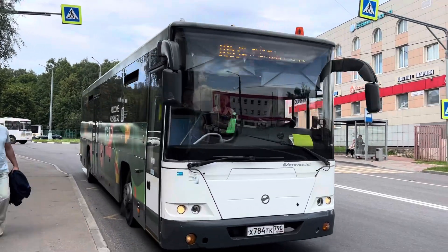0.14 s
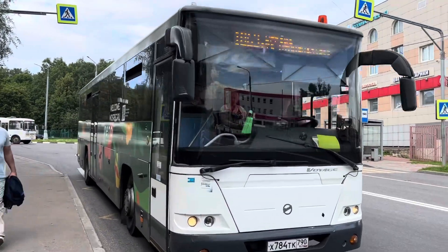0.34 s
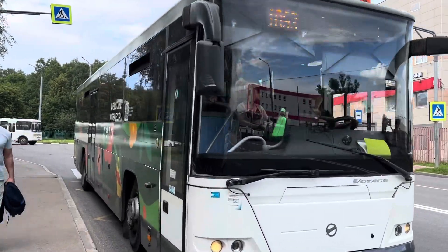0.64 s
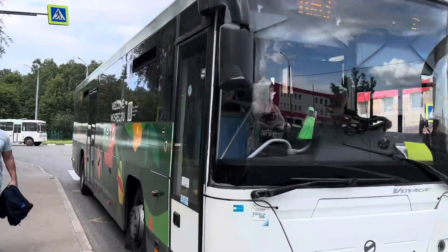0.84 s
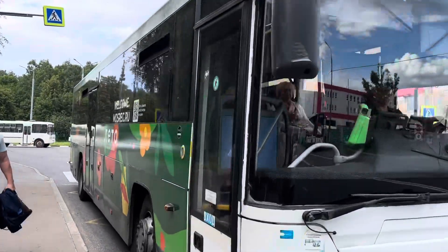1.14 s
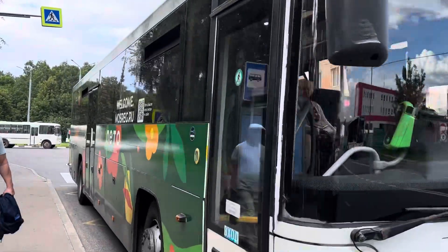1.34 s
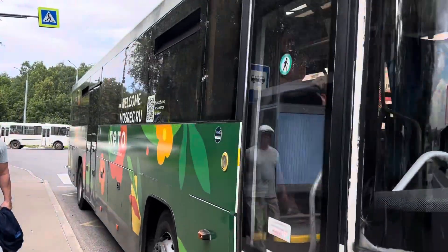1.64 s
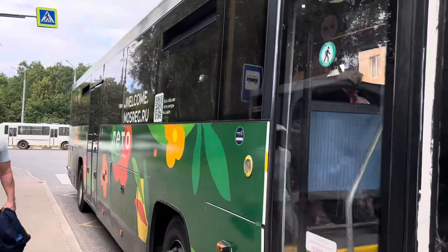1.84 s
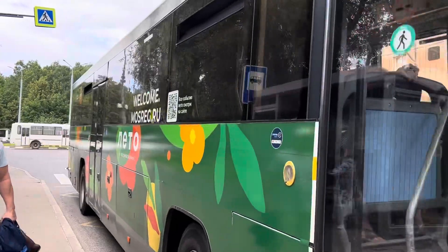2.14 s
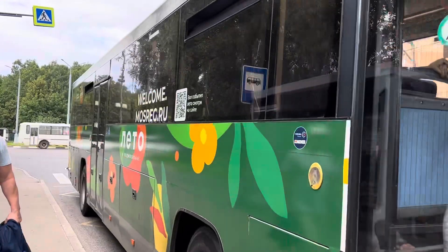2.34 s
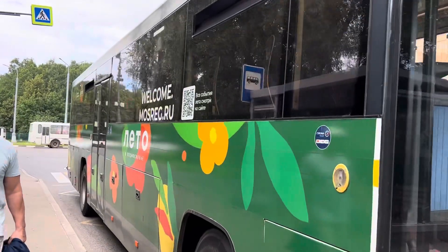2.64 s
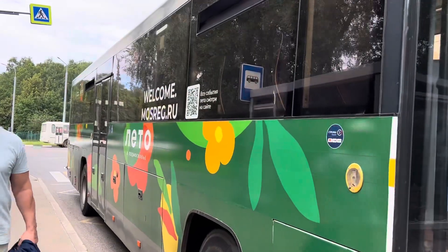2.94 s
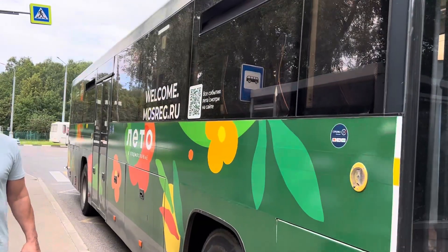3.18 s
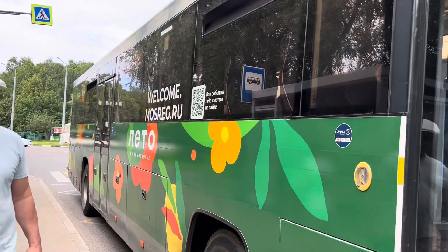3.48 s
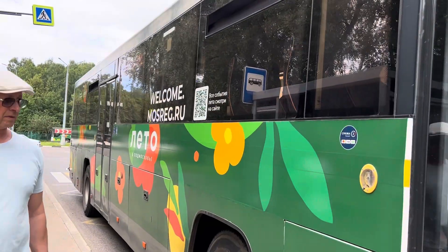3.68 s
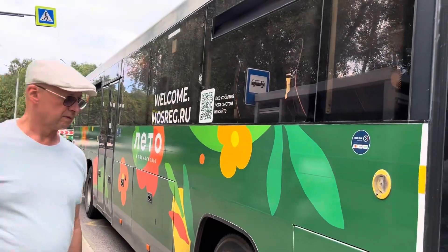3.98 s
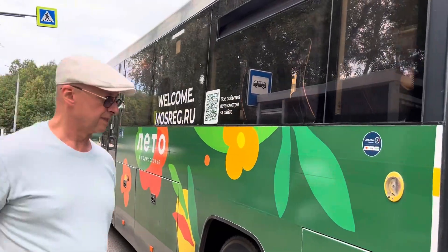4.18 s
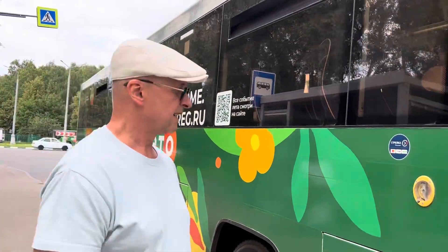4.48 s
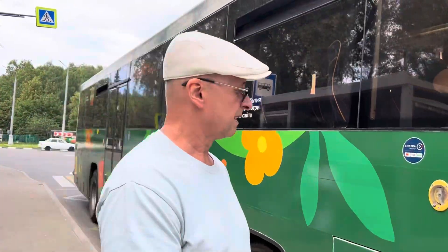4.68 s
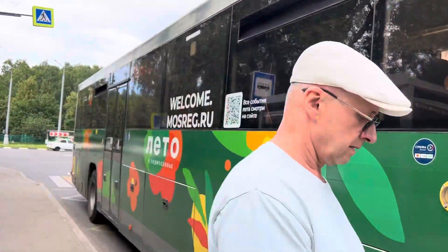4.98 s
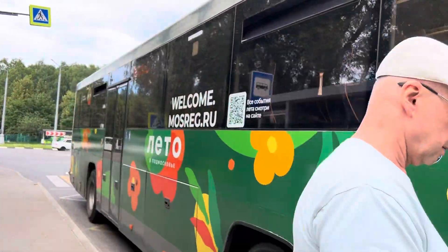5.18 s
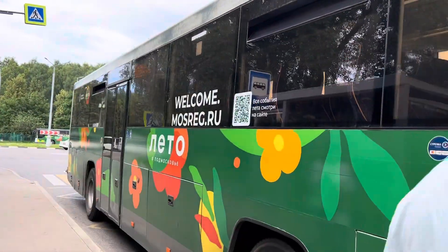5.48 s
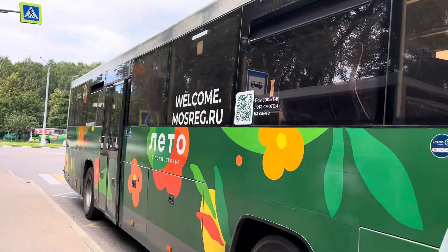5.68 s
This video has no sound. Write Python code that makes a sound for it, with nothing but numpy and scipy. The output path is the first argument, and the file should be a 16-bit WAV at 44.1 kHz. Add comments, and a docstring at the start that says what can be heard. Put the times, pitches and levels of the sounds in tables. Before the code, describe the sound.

High metallic bus brakes shriek and waver for under three seconds, then stop amid dull thuds, leaving a rumbling idle and tiny air puffs.

```python
"""Brake squeal over a diesel: a city bus rolls up to a roadside stop and halts by a phone on the pavement.
Several brake modes, tones with random flutter, beat together over filtered pad hiss and a tyre drone.
Low thumps, soft pushes coloured by a few resonances, and gusts of noise come mostly around the halt.
Noise shaped into rumble, drone and clatter, plus a hum, makes the diesel idling on at the far end.
Enveloped noise gives the air vents, a thin lingering hiss, small ticks and short valve puffs."""
import sys
import numpy as np
from scipy import signal
from scipy.fft import rfft, irfft
from scipy.io import wavfile

SR = 44100
rng = np.random.default_rng(int(sys.argv[2]) if len(sys.argv) > 2 else 0)


def to_wav(sig):
    """Store sig (one row per channel, or 1-D mono) as 16-bit WAV at the path in sys.argv[1].

    Samples outside -1..1 are clipped; the rate is SR.
    """
    pcm = np.clip(np.atleast_2d(sig), -1, 1) * 32767
    pcm = np.round(pcm).astype(np.int16)
    wavfile.write(sys.argv[1], SR, pcm.T)  # frames by channels


N = 256662
TIME = np.arange(N) / SR
FREQ = np.arange(N // 2 + 1) * SR / N

# the bus rolling in to its halt: (time [s], speed [m/s])
SPEED = [(0, 3.6), (.3, 3.5), (.6, 2.9), (1, 2.2), (1.4, 1), (2, .5), (2.4, .3), (2.7, 0)]
# the main squeal sags a little with the pad pressure: (time [s], pitch before Doppler and judder [Hz])
MAIN_PITCH = [(.3, 4718), (.62, 4708), (1.03, 4720), (1.25, 4688), (1.52, 4684), (1.8, 4710), (2.6, 4712)]
# level of the unrelated reflections against the direct sound (dB)
EXHAUST_DIFFUSE_DB, BLOCK_DIFFUSE_DB, TREBLE_DIFFUSE_DB = -16, -11, -9


def undb(db):
    """Decibels to gain."""
    return 10 ** (np.asarray(db) / 20)


def unit(x):
    """Scale to rms 1."""
    return x / np.sqrt(np.mean(np.abs(x) ** 2))


def curve(rows, order=1):
    """One column of a table, joined by straight lines in time."""
    rows = np.array(rows)
    return np.interp(TIME, rows[:, 0], rows[:, order])


def swell(rows):
    """Gain of a level table, fading away outside its span."""
    outside = np.maximum(rows[0][0] - TIME, 0) + np.maximum(TIME - rows[-1][0], 0)
    return undb(curve(rows)) * np.exp(-outside / 0.13)


def envelope(start, db, rise, fall, hold=0):
    """Gain with a straight rise, a hold and an exponential fall (times in s)."""
    age = TIME - start
    attack = np.clip(age / rise, 0, 1)
    decay = np.exp(-np.maximum(age - rise - hold, 0) / fall)
    return undb(db) * attack * decay


def noise(colour):
    """Noise of rms 1 with the given spectrum, falling 24 dB per octave beyond its ends."""
    hz, db = np.transpose(colour)
    octave, marks = np.log2(FREQ + 1), np.log2(hz)
    beyond = np.maximum(marks[0] - octave, 0) + np.maximum(octave - marks[-1], 0)
    gain = undb(np.interp(octave, marks, db) - 24 * beyond)
    return unit(irfft(rfft(rng.standard_normal(N)) * gain, N))


def wander(rate):
    """Random motion of rms 1, mostly slower than the rate (Hz)."""
    return unit(irfft(rfft(rng.standard_normal(N)) / (1 + (FREQ / rate) ** 2), N))


def flutter(rate, order=1):
    """Random motion of a tone's size and phase; a higher order keeps the tone tighter."""
    # drawn at 1/32 of the sample rate, then joined by straight lines
    offset = np.fft.fftfreq(N // 32, 32 / SR)
    lines = rng.standard_normal(len(offset)) + 1j * rng.standard_normal(len(offset))
    slow = np.fft.ifft(lines / (1 + np.abs(offset / rate) ** (2 * order)))
    return unit(np.interp(TIME, np.linspace(0, TIME[-1], len(slow)), slow))


def ports(hz):
    """Phase turn of the left and right microphone port at these frequencies."""
    # lead of the left port over the right: (frequency [Hz], phase [rad])
    port_phase = [(0, 0), (950, -.8), (1800, .2), (2500, 1.5), (3700, 1.1), (4750, 2.05), (5600, 2.8),
                  (6500, 3.3), (7200, 5.6), (9000, 6.7), (9450, 8.3), (9900, 9.3), (10700, 9.85),
                  (11400, 12), (13300, 12.5), (14200, 14.8), (15500, 15.7)]
    lead = np.interp(hz, *np.transpose(port_phase))
    return np.exp(1j * lead * np.array([[1], [-1]]) / 2)


def sides(pan_db):
    """Gains of the left and right port; positive pans left."""
    return undb(np.array([[pan_db], [-pan_db]]) / 2)


def spread(colour, diffuse_db, pan_db):
    """A noisy source at both ports: a direct part and unrelated reflections."""
    direct = irfft(rfft(noise(colour)) * ports(FREQ), N)
    reflections = np.array([noise(colour), noise(colour)])
    return unit(direct + undb(diffuse_db) * reflections) * sides(pan_db)


def bursts(rows, colour):
    """Jets of noise that open quickly and die away."""
    return sum(envelope(*row) for row in rows) * spread(colour, TREBLE_DIFFUSE_DB, 0)


def doppler():
    """Factor by which the approach raises every brake pitch (sound travels at 343 m/s)."""
    return 1 + curve(SPEED) / 343


def travel_left():
    """Metres that the bus has still to roll."""
    return np.cumsum(curve(SPEED)[::-1])[::-1] / SR


def nearness(rest_m):
    """Gain of a source that ends up this far away, 1 at rest."""
    return rest_m / (rest_m + travel_left())


def caught(mode):
    """Gain of one brake mode as it catches, holds and lets go."""
    # catches, before each mode's trim: (mode, time [s], level [dB], rise [s], fall [s], hold [s])
    catch_rows = [("upper", -0.035, -31, 0.018, 0.025, 0.021), ("upper", 0.048, -31.5, 0.023, 0.027, 0.014),
                  ("upper", 0.15, -49, 0.022, 0.022, 0.059), ("low", 0.243, -47.5, 0.039, 0.097, .05),
                  ("low", 0.407, -48, .04, 0.027, .04), ("low", 0.54, -45, 0.032, 0.017, 0.04),
                  ("low", 0.66, -42, 0.015, 0.0076, 0.019), ("low", 0.74, -55.5, 0.012, 0.12, 0.13),
                  ("low", 1.27, -44, .14, .04, .2), ("low", 1.5, -45.5, .08, .025, .02),
                  ("low", 1.62, -47, .06, .05, .22), ("low", 2.0, -47, .015, .012, .015),
                  ("low", 2.06, -48, 0.047, 0.029, 0.14), ("low", 2.287, -42, .06, 0.15, .022),
                  ("low", 2.82, -65, 0.024, .04, 0.043), ("thin", 0.17, -43.5, 0.071, .03, 0.54),
                  ("thin", 1.59, -37, 0.085, 0.022, 1.02), ("rasp", 0.19, -46, 0.17, 0.33, 0.14)]
    return sum(envelope(*row) for name, *row in catch_rows if name == mode)


def grabs():
    """Gain of the main squeal: a steady swing, and a bell-shaped surge each time the pad bites."""
    # steady swing, easing midway and pressed home for the stop: (time [s], level [dB])
    steady_rows = [(.19, -50), (.27, -29), (.68, -28.5), (.9, -38.5), (.96, -31.5), (1.25, -33),
                   (1.45, -34.5), (1.95, -30.5), (2.15, -39), (2.25, -24), (2.35, -24), (2.38, -25),
                   (2.5, -26), (2.635, -27), (2.675, -48), (2.9, -57)]
    # pad bites: (time of the peak [s], level [dB], length [s])
    surge_rows = [(.3, -21.5, 0.029), (.39, -22.5, 0.085), (0.532, -18.5, 0.025), (0.606, -23.5, 0.045),
                  (0.662, -24, 0.028), (0.787, -26, .016), (0.87, -31, .011), (1.017, -26, 0.042),
                  (1.328, -26.5, .021), (1.581, -24, .013), (1.646, -24.5, 0.036), (1.691, -21, 0.015),
                  (1.724, -23.5, .016), (1.782, -20.5, 0.016), (1.814, -24, 0.014), (1.873, -24, .018),
                  (1.894, -24, 0.019), (1.956, -22.5, .014), (2.042, -18, 0.051), (2.118, -21.5, .022),
                  (2.188, -20.5, 0.031), (2.3, -21.5, 0.044), (2.553, -26.5, .03), (2.602, -24.5, 0.028)]
    power = swell(steady_rows) ** 2
    for peak, db, length in surge_rows:
        bell = np.exp(-(2 * (TIME - peak) / length) ** 2 / 2)
        power += (undb(db) * bell) ** 2
    return np.sqrt(power)


def judder():
    """Hertz by which the juddering pad bends the squeal: slower with the wheel, widest at walking pace."""
    rest_hz, hz_per_m_s = 11, 4.5
    bend_hz, wide_bend_hz = 7, 23  # always, and more at walking pace
    wide_s, wide_span_s = 1.55, .33  # centre and half length of the wide bend
    rate = rest_hz + hz_per_m_s * curve(SPEED)
    swing = np.cos(2 * np.pi * np.cumsum(rate * (1 + .25 * wander(8))) / SR)
    depth = bend_hz + wide_bend_hz * np.exp(-((TIME - wide_s) / wide_span_s) ** 2)
    return depth * (swing + .35 * wander(25))


def squeal(pitch, gain, rough, width_hz, scatter_db, pan_db, overtones_db=(), order=1):
    """One self-excited brake mode: ragged while the wheel turns fast, purer as it stops."""
    speed = curve(SPEED)
    ragged = rough * (0.18 + speed / (speed + 0.4))
    wave = (1 + ragged * flutter(width_hz, order)) / np.sqrt(1 + ragged ** 2)
    # the flutter in size is widened slightly
    size = np.abs(wave) ** 1.08
    phase = 2 * np.pi * np.cumsum(pitch) / SR + np.angle(wave)
    # reflections from road and body lift one port as they weaken the other
    scatter = undb(scatter_db) * flutter(38.5, order) * np.array([[1], [-1]])
    out = np.exp(1j * phase) * ports(pitch) * (1 + scatter)
    # overtones grow faster than the swing
    drive = (gain / gain.max()) ** 0.18
    for multiple, db in enumerate(overtones_db, start=2):
        out = out + undb(db) * drive * np.exp(1j * multiple * phase) * ports(multiple * pitch)
    return np.sqrt(2) * gain * size * np.real(out) * sides(pan_db)


def chirps(bend):
    """Lesser brake modes grow and fade in an arch, bent by the judder and broader the rougher they rub."""
    # (from [s], to [s], pitch before Doppler and judder [Hz], level before trim [dB], roughness [ratio])
    chirp_rows = [(.27, .36, 2458, -54, 1.5), (.83, .95, 2462, -51, 1), (1.35, 1.45, 2460, -56, 1.5),
                  (1.76, 1.85, 2460, -57, 1.5), (2.085, 2.115, 2300, -49, .3), (1.16, 1.21, 4220, -49, 3),
                  (1.41, 1.45, 4290, -49, 2), (1.48, 1.53, 4200, -49, 3), (1.66, 1.72, 4230, -50, 2),
                  (1.85, 1.89, 3950, -50, 3), (1.94, 1.98, 4170, -50, 2), (2.19, 2.23, 4230, -48, 3),
                  (2.235, 2.265, 4375, -48, .5), (1.14, 1.18, 4900, -43, 3), (1.55, 1.61, 4850, -45, 1),
                  (.92, 1.02, 5750, -56, 6), (1.24, 1.45, 6290, -57, 1), (2.7, 3, 6330, -59, .3),
                  (.12, .19, 7400, -59, 6), (.25, .7, 7200, -62, 7), (1.04, 1.09, 8100, -58, 4),
                  (1.05, 1.12, 7620, -58, 4), (1.18, 1.22, 7830, -54, 2), (1.36, 1.48, 7070, -52, 2),
                  (1.385, 1.42, 7300, -51, 3), (1.55, 1.68, 7050, -50, 1.5), (1.78, 1.83, 7200, -52, 4),
                  (2.08, 2.11, 7000, -51, 1), (1.94, 2, 8080, -56, 2), (1.8, 2.52, 7360, -59, 1.2),
                  (1.85, 2.45, 7750, -62, 1.5), (.3, 1.9, 8450, -65, 2), (1.95, 2.6, 8465, -61, .7),
                  (1.8, 2, 12720, -62, 3), (2.42, 2.66, 14555, -60, .3)]
    trim_db = 7.5
    out = np.zeros((2, N))
    shift = doppler() + bend / MAIN_PITCH[-1][1]
    for start, end, hz, db, rough in chirp_rows:
        on = (TIME > start) & (TIME < end)
        arch = np.sqrt(np.abs(np.sin(np.pi * (TIME[on] - start) / (end - start))))
        wave = (1 + rough * flutter(10 + 20 * rough)[on]) / np.sqrt(1 + rough ** 2)
        phase = 2 * np.pi * hz * np.cumsum(shift[on]) / SR
        out[:, on] += undb(db + trim_db) * arch * np.real(wave * np.exp(1j * phase) * ports(hz))
    return out


def squeaks(low_hz, high_hz, count):
    """Tiny pad slips at random moments until the halt, each with its own pitch, glide and size; rms 1."""
    short_s, long_s = .004, .035
    max_glide, size_range_db = .012, 12  # glide as a share of the pitch
    out = np.zeros((2, N))
    for when, place, long, big, glide, turn in rng.random((count, 6)):
        size = int(SR * short_s * (long_s / short_s) ** long)
        start = int(when * SPEED[-1][0] * SR)
        part = np.linspace(0, 1, size)
        hz = low_hz * (high_hz / low_hz) ** place
        gliding_hz = hz * (1 + max_glide * (2 * glide - 1) * part)
        phase = 2 * np.pi * (turn + np.cumsum(gliding_hz) / SR)
        gain = undb(size_range_db * big ** 2) * np.sin(np.pi * np.sqrt(part)) ** 2
        out[:, start:start + size] += gain * np.real(np.exp(1j * phase) * ports(hz))
    return unit(out)


def scrape():
    """The pads hiss and spit metallic squeaks; at walking pace they also chatter around the main squeal."""
    # hiss of the pads: (frequency [Hz], relative level [dB])
    rub_colour = [(2000, 8), (3200, 9), (4400, 10), (5300, 8.5), (6500, 14.5), (7300, -16), (8000, -46),
                  (9300, 20.5), (10200, -11.5), (11500, -21), (12700, -30), (15500, 5)]
    rest_m, knee_m_s = 6, 0.57  # distance at rest; speed below which the pads go quiet
    chatter_s, chatter_span_s = 1.4, 0.56  # peak and half length
    speed = curve(SPEED)
    strength = nearness(rest_m) * speed / np.hypot(speed, knee_m_s)
    hiss = undb(-49) * spread(rub_colour, TREBLE_DIFFUSE_DB, 0)
    grit = undb(-69) * squeaks(6800, 9300, count=1500)
    ringing = undb(-62.5) * squeaks(6950, 7900, count=700)
    chatter_gain = undb(-52.5) * np.exp(-((TIME - chatter_s) / chatter_span_s) ** 2)
    chatter = chatter_gain * squeaks(3950, 4800, count=1900)
    return (hiss + grit + ringing) * strength + chatter


def brakes():
    """Six main modes take turns and beat against each other over chirps and the hiss of the pads."""
    # upper partner slides down to the main squeal, returns higher: (time [s], pitch before Doppler [Hz])
    upper_pitch = [(.09, 4816), (.16, 4792), (.22, 4735), (1.7, 4856), (2.6, 4858), (2.72, 4848)]
    # it takes over in swells, loudest near 2.3 s, and rings out: (time [s], level [dB])
    upper_level = [(1.8, -47), (1.92, -35.5), (1.98, -38), (2.04, -27), (2.075, -31), (2.11, -22),
                   (2.145, -23), (2.175, -28), (2.24, -16), (2.35, -15.5), (2.44, -18), (2.515, -38),
                   (2.56, -20), (2.635, -29.5), (2.68, -25.5), (2.89, -30), (3.06, -63)]
    # highest mode, loudest at the halt, before trim and waver: (time [s], level [dB])
    top_level = [(0.0, -47.5), (0.84, -42.5), (1.85, -42.5), (1.97, -50), (2.03, -40.5), (2.56, -43.5),
                 (2.68, -33.5), (2.95, -54), (3.18, -69)]
    low_hz, thin_hz, rasp_hz, top_hz = 3677, 10592, 11880, 12136  # before Doppler
    lift, bend = doppler(), judder()
    pace = curve(SPEED) / SPEED[0][1]  # 1 at full speed
    upper_hz = curve(upper_pitch) * lift
    out = squeal(curve(MAIN_PITCH) * lift + bend, grabs(), rough=.24, width_hz=52,
                 scatter_db=-6.5, pan_db=-1.0, overtones_db=(-15, -32), order=2)
    out += squeal(upper_hz, undb(4.0) * caught("upper"), rough=0.27, width_hz=40,
                  scatter_db=-4.5, pan_db=-1.5, overtones_db=(-18,))
    out += squeal(upper_hz, swell(upper_level), rough=0.16, width_hz=14,
                  scatter_db=-20, pan_db=-2, overtones_db=(-25,))
    low_drift_hz = 4 * wander(4.7)
    out += squeal(low_hz * lift + low_drift_hz, undb(3.0) * caught("low"), rough=0.13, width_hz=63,
                  scatter_db=-3.5, pan_db=-0.5, overtones_db=(-21,), order=2)
    out += squeal(thin_hz * lift, undb(-2.0) * caught("thin"), rough=0.82, width_hz=59,
                  scatter_db=-21.0, pan_db=0.0)
    # as the wheel slows the highest mode jitters less in pitch and wavers more in strength
    top_jitter_hz = 38 * pace * wander(70)
    top_waver_db = 2.5 * (1.5 - pace) * wander(16)
    out += squeal(top_hz * lift + top_jitter_hz, undb(1.0 + top_waver_db) * swell(top_level),
                  rough=1.06, width_hz=55, scatter_db=-13.0, pan_db=0)
    # at speed the highest mode has a rasping lower neighbour
    out += squeal(rasp_hz * lift, caught("rasp"), rough=4, width_hz=160, scatter_db=-24, pan_db=1)
    return out + chirps(bend) + scrape()


def diesel():
    """Exhaust rumble, gently pulsing block drone, hum and randomly flickering clatter grow on approach."""
    # exhaust rumble: (frequency [Hz], relative level [dB])
    exhaust_colour = [(20, -19), (30, -45), (40, -4), (52, -1.5), (75, 3.5), (110, -2.5), (140, -5),
                      (200, -31), (400, -51)]
    # drone of the engine block: (frequency [Hz], relative level [dB])
    block_colour = [(80, -25), (140, -9), (225, 2.5), (270, -5), (345, -2), (480, -10.5), (680, -10),
                    (900, -13), (1100, -13.5), (1350, -28.5), (2000, -45)]
    # mechanical clatter: (frequency [Hz], relative level [dB])
    clatter_colour = [(700, -13), (1300, 2.5), (1700, 1.5), (2200, 2.5), (2600, -4.5), (3500, -11),
                      (4000, -7), (4500, -9.5), (5300, -9.5), (6200, -19.5), (7800, -18), (10300, -27),
                      (12500, -24), (15500, -27)]
    firing_hz, hum_hz, rest_m = 34.5, 162.2, 14.2
    firing = np.cos(2 * np.pi * np.cumsum(firing_hz * (1 + 0.0773 * wander(3.46))) / SR)
    exhaust_db = -31 + 0.12 * wander(1.4)
    exhaust = spread(exhaust_colour, EXHAUST_DIFFUSE_DB, 0) * undb(exhaust_db)
    block_db = -32.5 + 1.0 * firing + 0.66 * wander(18.0)
    block = spread(block_colour, BLOCK_DIFFUSE_DB, 2.45) * undb(block_db)
    clatter_db = -47 + 0.17 * firing + 1.25 * wander(29)
    clatter = spread(clatter_colour, TREBLE_DIFFUSE_DB, 0.27) * undb(clatter_db)
    hum = undb(-38.5) * np.real((1 + .5 * flutter(3.6)) * np.exp(2j * np.pi * hum_hz * TIME))
    # someone walks past and shades the clatter by 2 dB
    shade = undb(-2 * np.exp(-((TIME - 4.41) / 0.34) ** 2))
    # the drone swells by 1.3 dB once the bus stands
    step = undb(1.3 * np.clip((TIME - 3.9) / 0.25, 0, 1))
    return (exhaust + block * step + clatter * shade + hum) * nearness(rest_m)


def tyres():
    """The front tyre drones as it draws level and falls silent as it stops."""
    # rolling drone: (frequency [Hz], relative level [dB])
    tyre_colour = [(150, -20), (230, -1), (300, -6.5), (450, -5.5), (800, -23), (1300, -17)]
    level_db, rest_m = -33, 0.37  # level at 1 m/s at the resting distance
    rolling = nearness(rest_m) * np.sqrt(curve(SPEED))
    return spread(tyre_colour, BLOCK_DIFFUSE_DB, 1.2) * undb(level_db) * rolling


def gusts():
    """Eddies buffet both ports, partly alike and partly each on its own."""
    # gusts on the microphone, before buffeting: (time [s], level [dB], rise [s], fall [s], hold [s])
    gust_rows = [(0.377, -39, 0.055, 0.12, 0.29), (2.643, -20.5, 0.029, 0.033, 0.064),
                 (2.86, -27.5, 0.052, 0.13, 0.028), (3.113, -19, 0.033, 0.029, 0.012),
                 (3.644, -25.5, 0.11, 0.36, 0.089)]
    # rumble of the air: (frequency [Hz], relative level [dB])
    gust_colour = [(25, -18), (50, 4.5), (110, -1.5), (200, -10), (350, -21), (700, -43.5)]
    strength = sum(envelope(*row) for row in gust_rows) * undb(3.4 * wander(11))
    return spread(gust_colour, -4.0, 0) * strength


def vents():
    """Air let out of the brakes in sputtering jets of noise."""
    # releases, before sputter: (time [s], level [dB], rise [s], fall [s], hold [s])
    vent_rows = [(1.39, -46, 0.027, 0.063, .005), (2.595, -40.5, 0.0059, 0.064, 0.041),
                 (2.885, -52.5, 0.0087, 0.1, .02), (2.92, -43, 0.015, 0.035, 0.039),
                 (3.66, -52, 0.012, 0.23, .005)]
    # hiss of the jet: (frequency [Hz], relative level [dB])
    vent_colour = [(900, 8.5), (2100, 12), (3000, 8.5), (4500, 1.5), (6000, -6), (7500, 1), (9000, 3),
                   (10500, -25), (12500, -2), (15000, -18)]
    sputter_db = 1.8 * wander(45)
    return bursts(vent_rows, vent_colour) * undb(sputter_db)


def thumps():
    """Low thumps at the phone, perhaps wind or handling: soft pushes coloured by a few low resonances."""
    # soft pushes: (time [s], level before colouring and trim [dB], length of the push [ms])
    push_rows = [(2.66, -16, 5.9), (2.696, -16, 10.4), (2.712, -18.5, 2.5), (2.734, -13.5, 1.85),
                 (2.88, -17, 5.7), (3.14, -19, 4.7), (3.147, -10.5, 5.7), (3.158, -15.5, 5.7)]
    # low resonances: (frequency [Hz], width [Hz], level before trim [dB])
    resonance_rows = [(73.4, 34, 3.5), (106, 62, -21), (167, 57, -3), (191, 60, 5.5), (274, 23, 0)]
    force, shudder = np.zeros(N), wander(110)
    for start, db, push_ms in push_rows:
        part = np.clip((TIME - start) * 1000 / push_ms, 0, 1)
        force += undb(db) * np.sin(np.pi * part)
        # each push brings a brief low shudder, set 17 dB below it
        force += shudder * envelope(start, db - 17, rise=0.0081, fall=0.0085)
    response = 0
    for hz, width, db in resonance_rows:
        damping = 1j * FREQ * width
        response = response + undb(db) * damping / (hz ** 2 - FREQ ** 2 + damping)
    return undb(3.5) * irfft(rfft(force) * response, N) * sides(0.36)


def leak():
    """A thin band of air hiss opens after the halt, then sinks in pitch and lingers as the pressure falls."""
    # one faint hiss, before wavering: time [s], level [dB], rise [s], fall [s], hold [s]
    leak_row = (3.2, -63, .3, 1.1, .55)
    start_hz, end_hz, sink_s, width_hz = 4280, 3950, 1.2, 170
    hz = curve([(leak_row[0], start_hz), (leak_row[0] + sink_s, end_hz)])
    jet = flutter(width_hz) * np.exp(2j * np.pi * np.cumsum(hz) / SR)
    return unit(np.real(jet * ports(hz))) * envelope(*leak_row) * undb(wander(9))


def ticks():
    """Small ticks: noise with a sharp onset and a fall of milliseconds."""
    # (time [s], level [dB], rise [s], fall [s])
    tick_rows = [(4.296, -48, 0.0011, 0.0091), (4.604, -46, .001, .004), (4.854, -51, .001, .004),
                 (5.146, -50, .001, 0.0065)]
    # (frequency [Hz], relative level [dB])
    tick_colour = [(2500, -29), (5300, 10), (8400, -8), (9100, 15), (10000, -10), (15500, -8)]
    return bursts(tick_rows, tick_colour)


def puffs():
    """Short puffs of the air valves: brief bursts of bright noise."""
    # (time [s], level [dB], rise [s], fall [s])
    puff_rows = [(4.771, -42.5, 0.0038, 0.019), (4.795, -54, 0.006, .012), (5.43, -49.5, 0.014, .018),
                 (5.612, -52, 0.0062, .015), (5.632, -52, .006, 0.03)]
    # (frequency [Hz], relative level [dB])
    puff_colour = [(2500, -22), (4800, 10), (8000, 6), (12500, 1), (15500, 2)]
    return bursts(puff_rows, puff_colour)


def scene():
    """The whole stop, left and right."""
    rolling = brakes() + diesel() + tyres()
    halting = gusts() + vents() + thumps()
    return rolling + halting + leak() + ticks() + puffs()


def record(dry):
    """The phone cuts the deepest bass (below 32 Hz) and the top (above 15750 Hz)."""
    thinned = signal.sosfilt(signal.butter(3, 32, "high", fs=SR, output="sos"), dry)
    return signal.sosfilt(signal.ellip(10, .2, 80, 15750, fs=SR, output="sos"), thinned)


dry = scene()
out = record(dry)
to_wav(out)
```